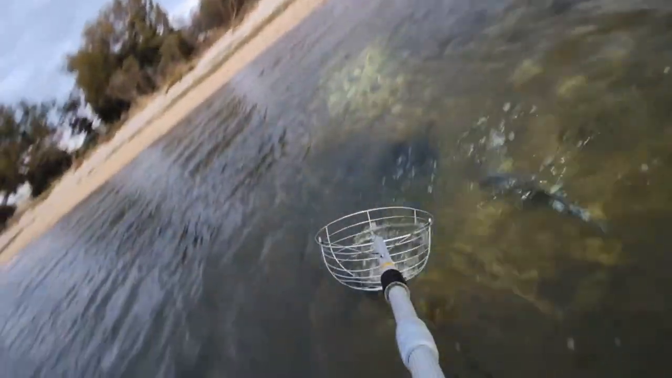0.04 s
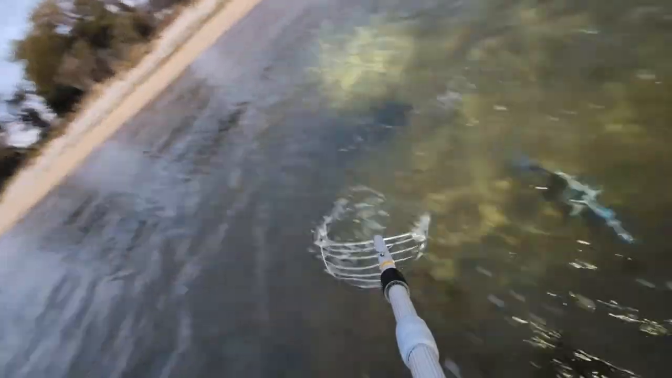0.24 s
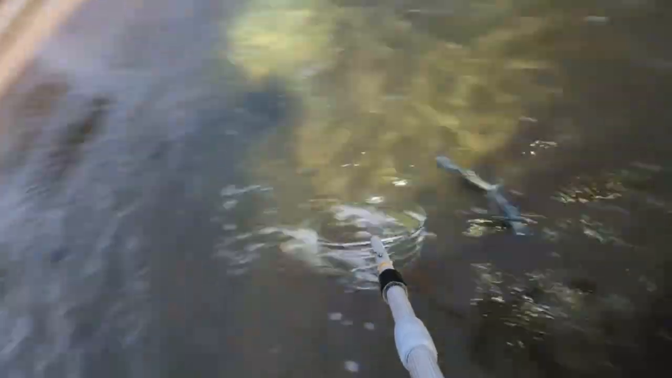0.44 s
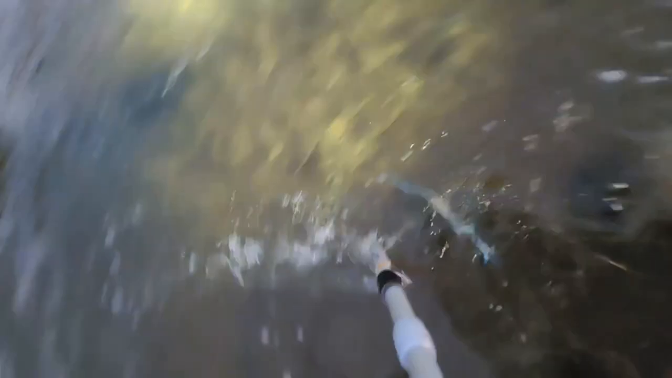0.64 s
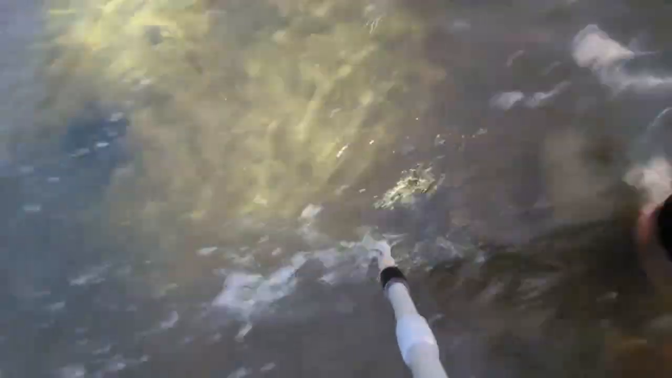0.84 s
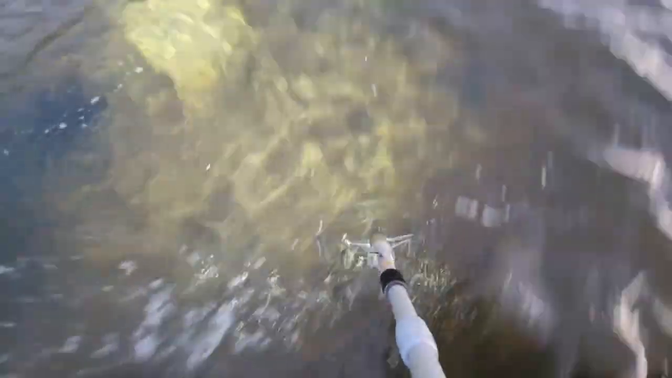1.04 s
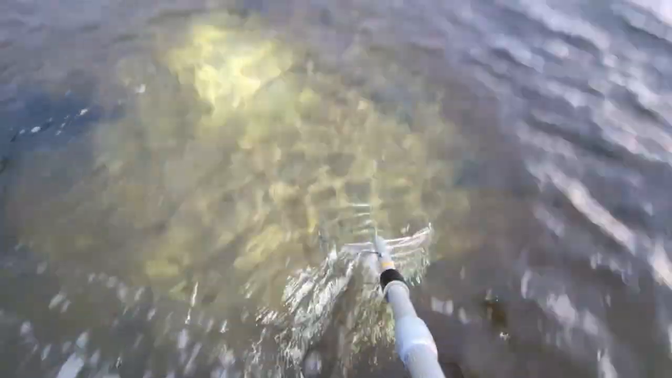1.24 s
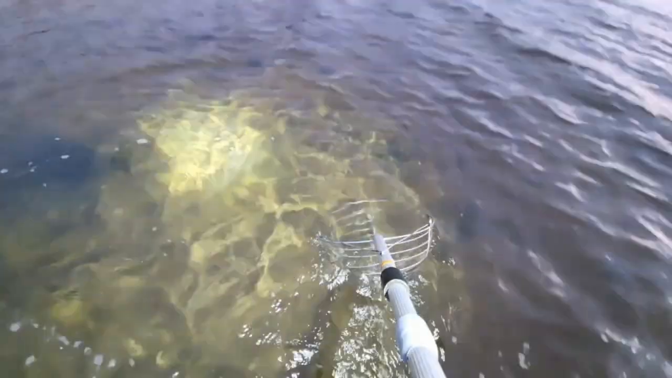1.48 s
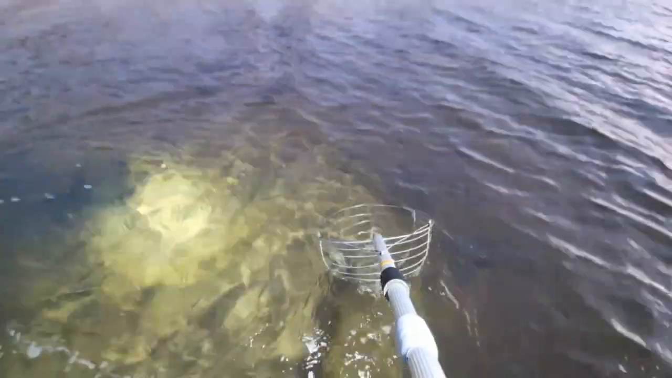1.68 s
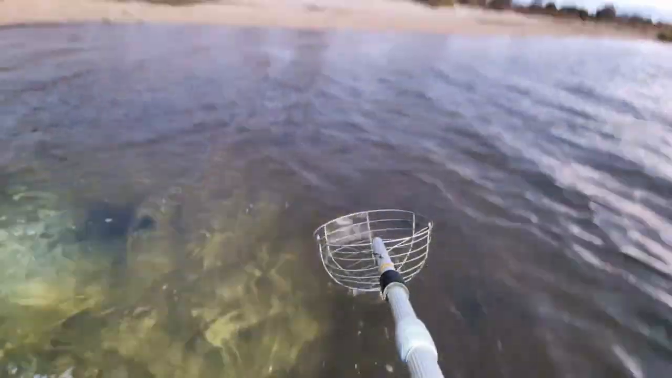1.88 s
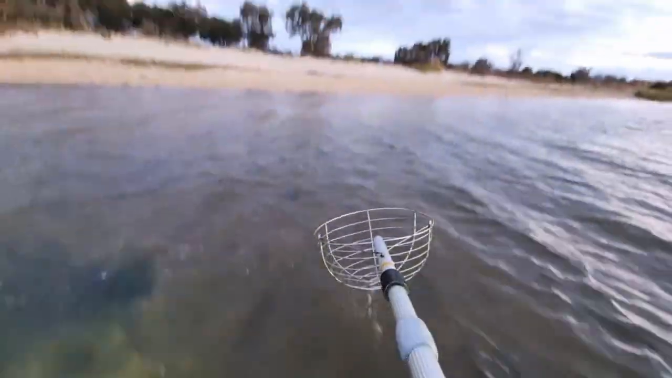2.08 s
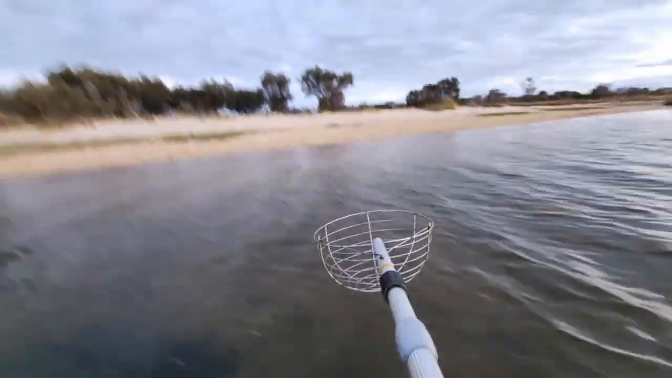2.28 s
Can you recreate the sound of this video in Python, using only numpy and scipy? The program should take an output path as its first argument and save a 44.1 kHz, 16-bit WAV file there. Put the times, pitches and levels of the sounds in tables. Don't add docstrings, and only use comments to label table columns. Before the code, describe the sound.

Splashy, bubbling water stirred by a wire net, with one hissing spray burst and buffeting wind

```python
import sys
import numpy as np
from scipy import signal
from scipy.fft import rfft, irfft, next_fast_len
from scipy.io import wavfile
from scipy.ndimage import uniform_filter1d, map_coordinates

SR = 44100
rng = np.random.default_rng(int(sys.argv[2]) if len(sys.argv) > 2 else 0)


def dump(signal):
    limited = np.clip(np.atleast_2d(signal).T, -1, 1)
    pcm = np.round(limited * 32767).astype(np.int16)
    wavfile.write(sys.argv[1], SR, pcm)


def natural_amplitude(level_db):
    exponent = np.asarray(level_db, float) / 20
    return 10 ** exponent


N = 101430
TIME = np.arange(N) / SR

# (frequency [Hz], density [dB per Hz])
HISS_COLOUR = [(500, -8), (1000, -12), (2500, -12.5), (6000, -4), (10000, -9.5), (12000, 0), (15800, -5)]
# (frequency [Hz], correlation [0-1])
PORT_LIKENESS = [(400, 1), (1500, 0.54), (4000, 0.26), (8000, 0.32), (15000, 0.01)]
# (time [s], level [dB])
GUSTS = [(0, -50.5), (.1, -50.5), (.25, -36), (.33, -43.5), (.47, -35), (.63, -27), (.77, -32.5),
         (.87, -26), (.94, -34), (1.02, -28), (1.1, -29.5), (1.25, -31.5), (1.38, -28), (1.47, -37),
         (1.6, -34), (1.85, -36), (2.0, -37.5), (2.3, -50.5)]
# (frequency [Hz], density [dB per Hz])
RUMBLE_COLOUR = [(20, -6.5), (55, 4.5), (130, 2), (300, -0.5), (450, -8.5), (800, -24), (1500, -43)]
# (time [s], level [dB])
MOAN_LEVEL = [(.8, -54), (1.01, -27), (1.08, -38), (1.14, -31), (1.3, -41), (1.4, -35), (1.65, -51)]
# (time [s], peak level [dB], frequency [Hz], left-right difference [dB])
THUMPS = [(0.561, -20.5, 177, 9.5), (0.621, -35, 65.4, 12), (0.713, -18.5, 370, -14), (0.727, -8, 304, 1),
          (0.843, -13.5, 390, -2), (0.862, -14.5, 315, 0), (0.983, -16.5, 323, 3.5), (1.151, -18, 306, -10),
          (1.34, -29, 295, -2), (1.359, -29.5, 125, -4), (1.509, -28.5, 244, -21.5), (1.569, -23, 176.4, 1),
          (1.987, -21.5, 296, -6), (.242, -29, 125, 2), (0.379, -30, 135, -8), (0.621, -35, 65.3, 13),
          (0.692, -31, 136, 15), (1.006, -32, 110.5, -20.5), (1.199, -33, 151, 3), (1.696, -25.5, 119, 2),
          (2.0, -32.5, 110, 13), (2.158, -35, 72.6, 6)]
# (time [s], peak level [dB], centre frequency [Hz])
DROPLETS = [(0.0793, -27, 12600), (0.0951, -16.5, 6600), (0.244, -21, 3670), (0.3016, -30, 5170),
            (0.377, -23, 11400), (0.399, -26.5, 5000), (0.6024, -19, 7600), (0.6668, -21, 5600),
            (0.985, -15, 9000), (0.679, -26, 9000), (0.191, -28, 11000), (1.25, -20.5, 6900),
            (1.311, -21.5, 4580), (1.3248, -24, 6540), (1.8746, -28, 11800), (1.893, -25, 14000),
            (1.915, -23, 11800), (1.95, -24.5, 7240), (1.9735, -22, 4210), (1.9907, -16.5, 4840),
            (2.0893, -29, 6300), (0.157, -22, 4000), (1.109, -38, 11000), (1.114, -24.5, 4540),
            (1.243, -26, 10000), (1.258, -17, 5960), (1.329, -29, 9100), (1.345, -41, 6000),
            (1.36, -39, 8000), (1.439, -33, 10000), (1.733, -44, 6000), (1.766, -52, 6000),
            (1.858, -31, 12700), (2.03, -28, 4500), (2.107, -28, 12700)]
# (time [s], peak level [dB], frequency [Hz], life [cycles])
EARLY_BUBBLES = [(.082, -45.5, 1230, 34), (0.102, -38, 342.5, 130), (0.133, -26.5, 3260, 10.5),
                 (.166, -26.5, 785, 6.8), (0.175, -14.5, 2960, 4.5), (.33, -34.5, 2034, 20),
                 (.345, -23.5, 1215, 1.85), (.526, -30, 2320, 9.7), (0.535, -28, 1280, 12),
                 (0.574, -17.5, 688, 4), (.591, -32, 2160, 12), (.613, -19.5, 1044, 5),
                 (0.645, -22, 613, 3.2), (0.731, -19.5, 534, 2.9), (0.843, -26, 1410, 6.7),
                 (.914, -26.5, 534, 2.7), (0.986, -25.5, 2840, 53), (0.99, -34.5, 1474, 140),
                 (0.992, -25.5, 3770, 91), (1.02, -26.5, 286.5, 18), (1.155, -30, 629, 29),
                 (1.171, -31.5, 3170, 12), (1.176, -35.5, 854, 21), (1.53, -33, 1640, 11.5),
                 (1.548, -33, 1197, 17.5), (1.593, -36.5, 2700, 11), (1.608, -29.5, 607, 17),
                 (.104, -39, 764, 8), (0.127, -30, 960, 8), (.16, -31, 400, 8.8), (0.098, -34, 3050, 8.8),
                 (.142, -25.5, 3440, 6.4), (.498, -32, 470, 6.5), (.555, -30.5, 910, 6.5),
                 (.656, -23.5, 326, 4.1), (.825, -28.5, 390, 4.8), (0.845, -35, 1500, 58),
                 (1.033, -29, 3565, 99), (0.994, -28.5, 5590, 150)]
# (time [s], peak level [dB], frequency [Hz], life [cycles])
LATER_BUBBLES = [(1.635, -27.5, 630, 4.8), (1.668, -32.5, 618, 31), (1.676, -28, 496, 11),
                 (1.735, -19.5, 1320, 4.5), (1.766, -23, 1070, 4.5), (1.772, -31.5, 3350, 27),
                 (1.795, -31, 1290, 5.1), (1.814, -33, 347, 29), (1.896, -36, 2100, 31),
                 (2.005, -35.5, 578, 26.5), (2.176, -37.5, 2760, 7.2), (2.186, -41, 553, 15),
                 (2.292, -45.5, 1040, 13), (1.091, -30, 460, 2.7), (1.359, -30, 636, 2.1),
                 (1.429, -52, 820, 18), (1.439, -48, 482, 4.2), (1.234, -44, 1970, 21),
                 (1.326, -33, 3000, 6.1), (1.695, -30, 483, 3.5), (1.728, -29, 1330, 5.3),
                 (1.765, -28.5, 450, 4.7), (1.82, -32, 620, 9.8), (1.945, -60, 1180, 6.7),
                 (1.975, -31.5, 2290, 12), (2.185, -49, 1360, 17), (2.232, -50.5, 2150, 11)]
# (time [s], peak level [dB], frequency [Hz], life [cycles])
SURFACE_BURSTS = [(0.23, -49.5, 830, 28), (1.4, -32, 900, 20.5), (1.1, -35.5, 730, 17),
                  (0.16, -41, 780, 27), (.215, -43, 860, 35), (1.92, -59, 950, 14), (2.261, -45.5, 780, 20),
                  (0.52, -36, 1300, 11), (1.69, -30.5, 1400, 10)]
# (time [s], hold [s], level [dB], typical drop frequency [Hz])
SPRAY_SHEETS = [(0.089, 0.049, -45, 3540), (0.569, 0.17, -53, 5000), (0.839, 0.12, -42, 2780),
                (0.944, 0.018, -26, 4130), (0.981, 0.015, -25.5, 3875), (1.001, 0.029, -29, 4520),
                (1.025, 0.016, -29, 3510), (1.05, 0.018, -39, 3670), (1.086, 0.088, -51.5, 4110),
                (1.23, 0.028, -53, 3960), (1.318, 0.038, -53.5, 3400), (1.95, 0.051, -50, 2570)]
# (frequency [Hz], density [dB per Hz])
FIZZ_COLOUR = [(700, 2.5), (2000, 3), (3000, 5.5), (5800, 3.5), (6600, -5), (9000, -13), (13000, -8),
               (16000, -18.5)]
# (time [s], level [dB])
STROKE_EFFORT = [(.06, -62.5), (.11, -33.5), (.2, -33.5), (.27, -53), (.38, -42), (.46, -43), (.59, -35.5),
                 (.833, -52), (.843, -31.5), (1.17, -47), (1.47, -57.5), (1.57, -54.5), (1.63, -40),
                 (1.74, -36.5), (1.88, -50.5), (1.98, -40.5), (2.08, -52.5), (2.3, -58.5)]
# (frequency [Hz], density [dB per Hz])
WASH_COLOUR = [(250, -57), (350, -5.5), (700, -13.5), (1500, -6.5), (3200, -11), (6000, -20.5),
               (12500, -26.5), (16000, -22)]


def unit(x):
    return x / np.sqrt(np.mean(x ** 2) + 1e-20)


def along(points, hz):
    f, value = np.transpose(points)
    return np.interp(np.log(hz + 1), np.log(f + 1), value)


def curve(points):
    s, value = np.transpose(points)
    return np.interp(TIME, s, value)


def wobble(rate):
    knots = rng.standard_normal((2, 400))
    return np.array([map_coordinates(k, [TIME * rate]) for k in knots])


def filtered(x, response):
    m = next_fast_len(N + 8192)
    return irfft(rfft(x, m) * response(np.fft.rfftfreq(m, 1 / SR)), m)[..., :N]


def noise(spectrum, patchy_db=3.5):
    z = signal.stft(rng.standard_normal((2, N)), nperseg=256)[2]
    patches = uniform_filter1d(rng.standard_normal(z.shape[1:]), size=5, axis=0)
    patches = uniform_filter1d(patches, size=5, axis=1)
    pair = signal.istft(z * natural_amplitude(patchy_db * unit(patches)), nperseg=256)[1][:, :N]
    return unit(filtered(pair, lambda hz: natural_amplitude(along(spectrum, hz))))


def ports(pair):
    def mid_side(hz):
        turn = np.arccos(np.clip(along(PORT_LIKENESS, hz), -1, 1)) / 2
        return np.array([np.cos(turn), np.sin(turn)])
    mid, side = filtered(pair, mid_side)
    return np.array([mid + side, mid - side])


def blips(s, gain, hz, cycles, rise, soft, size):
    t = np.arange(size) / SR
    life = (cycles / hz)[:, None]
    u = t / life
    phase = 2 * np.pi * hz[:, None] * (t + rise[:, None] * life * u * u / 2)
    envelope = np.exp(-2 * u * u - u) * (1 - np.exp(-u / soft))
    wave = gain[:, None] * np.sin(phase) * envelope
    at = np.round(s * SR).astype(int)[:, None] + np.arange(size)
    return np.bincount(at.ravel(), wave.ravel(), N + size)[:N]


def swarm(typical_hz, rate, cycles, spread, size_db, size):
    pair = []
    for _ in range(2):
        u, g = rng.random((12000, 3)), rng.standard_normal((12000, 2))
        s = np.cumsum(-np.log(u[:, 0] + 1e-9)) / rate
        keep = s < N / SR - 0.001
        s, u, g = s[keep], u[keep], g[keep]
        hz = typical_hz[(s * SR).astype(int)] * np.exp(spread * g[:, 0])
        hz = np.clip(hz, 340, 15000)
        life = np.minimum(cycles * np.exp(0.4 * g[:, 1]), hz * size / SR / 1.5)
        gain = natural_amplitude(-size_db * np.log(u[:, 1] + 0.02))
        pair.append(blips(s, gain, hz, life, rise=0.07 * u[:, 2], soft=0.08, size=size))
    return unit(np.array(pair))


def hiss():
    return natural_amplitude(-58 + wobble(10.7)[0]) * noise(HISS_COLOUR, patchy_db=4.0)


def buffeting():
    left_db = 2.5
    opposed = 0.084
    lumps = natural_amplitude(3 * wobble(60))
    port_db = np.array([[left_db], [-left_db]]) / 2
    rumble = natural_amplitude(curve(GUSTS) + port_db) * unit(lumps * noise(RUMBLE_COLOUR, patchy_db=1.0))
    return rumble - opposed * rumble[::-1]


def moan():
    centre_hz, width_hz = 267, 47
    hum = filtered(rng.standard_normal(N), lambda hz: np.exp(-((hz - centre_hz) / width_hz) ** 2))
    return natural_amplitude(curve(MOAN_LEVEL)) * unit(hum) * np.array([[1], [-1]])


def thumps():
    lag_s, cycles, lift_db = 0.00081, 3.6, 5.5
    s, db, hz, pan_db = np.transpose(THUMPS)
    pair = []
    for side in (0.5, -0.5):
        gain = natural_amplitude(db + lift_db + side * pan_db)
        pair.append(blips(s - side * lag_s, gain, hz, cycles + 0 * s, rise=0 * s, soft=0.34, size=4000))
    return np.array(pair)


def wind():
    return buffeting() + moan() + thumps()


def spits():
    lift_db, width_octaves, t60_s, attack_s = -8.5, 0.93, 0.013, 0.0009
    size = 2048
    t = np.arange(size) / SR
    hz = np.fft.rfftfreq(size, 1 / SR) + 1
    out = np.zeros((2, N + size))
    for s, db, centre_hz in DROPLETS:
        colour = np.exp(-(np.log2(hz / centre_hz) / width_octaves) ** 2)
        puff = unit(irfft(rfft(rng.standard_normal((2, size))) * colour))
        envelope = natural_amplitude(db + lift_db - 60 * t / t60_s) * (1 - np.exp(-t / attack_s))
        start = round(s * SR)
        out[:, start:start + size] += envelope * puff
    return ports(out[:, :N])


def bubbles():
    s, db, hz, cycles = np.transpose(np.vstack([EARLY_BUBBLES, LATER_BUBBLES, SURFACE_BURSTS]))
    submerged = len(EARLY_BUBBLES) + len(LATER_BUBBLES)
    rise = np.r_[np.full(submerged, 0.046), np.full(len(SURFACE_BURSTS), 1.0)]
    lag = 0.085 * rng.standard_normal(len(s)) / hz
    pair = [blips(s + side * lag, natural_amplitude(db + 4), hz, cycles, rise, soft=0.049, size=7000) for side in (-1, 1)]
    return np.array(pair)


def spray():
    attack_s, t60_s = 0.00083, 0.093
    mist_hz = 6300
    sheets = []
    for s, hold, db, _ in SPRAY_SHEETS:
        decay_db = 60 * np.clip(TIME - s - hold, 0, 2) / t60_s
        sheets.append(natural_amplitude(db - decay_db) * np.clip((TIME - s) / attack_s, 0, 1))
    sheets = np.array(sheets)
    drop_hz = np.array(SPRAY_SHEETS)[sheets.argmax(axis=0), 3]
    drops = swarm(drop_hz, rate=3000, cycles=49, spread=0.334, size_db=2, size=600)
    drops = filtered(drops, lambda hz: 1 / (1 + (hz / mist_hz) ** 20))
    flutter = natural_amplitude(0.82 * wobble(69.55)[0])
    return sheets.max(axis=0) * flutter * ports(drops + natural_amplitude(-3) * noise(FIZZ_COLOUR))


def churn():
    gurgle = swarm(964 + 0 * TIME, rate=500, cycles=6.7, spread=0.706, size_db=4, size=900)
    wash = noise(WASH_COLOUR) * natural_amplitude(3 * wobble(40)[0])
    crackle = swarm(5000 + 0 * TIME, rate=670, cycles=2.7, spread=0.54, size_db=5.9, size=100)
    return natural_amplitude(curve(STROKE_EFFORT)) * ports(gurgle + natural_amplitude(-16) * crackle + natural_amplitude(-5.5) * wash)


def scene():
    return hiss() + wind() + spits() + bubbles() + spray() + churn()


def roll_off(x):
    return signal.sosfilt(signal.butter(12, 16790, fs=SR, output="sos"), x)


def record(dry):
    fade_s, fade_db, top_hz = 0.065, -5.5, 15720
    fade = natural_amplitude(fade_db * np.clip(1 - TIME / fade_s, 0, 1))
    mix = filtered(dry * fade, lambda hz: hz < top_hz)
    return roll_off(mix)


dry = scene()
out = record(dry)
dump(out)
```